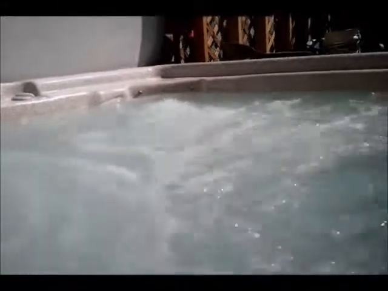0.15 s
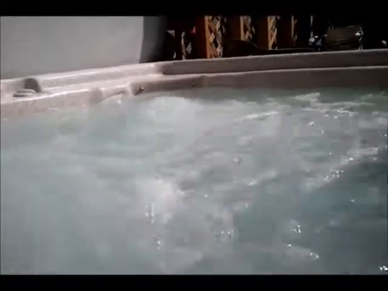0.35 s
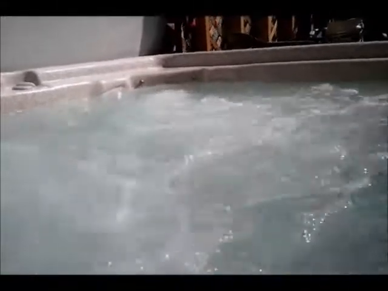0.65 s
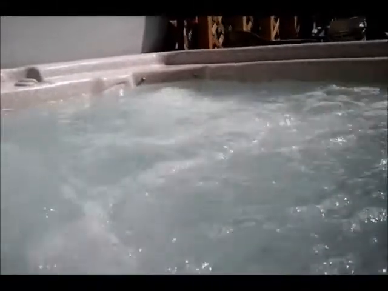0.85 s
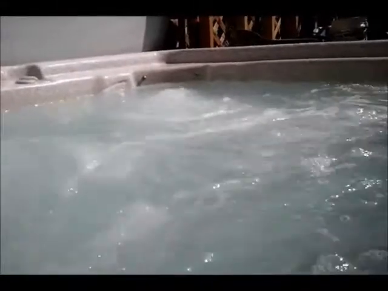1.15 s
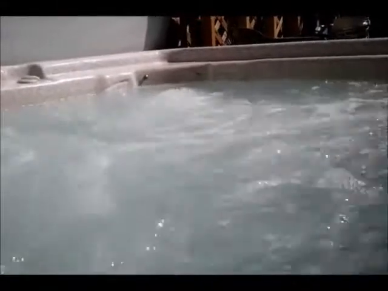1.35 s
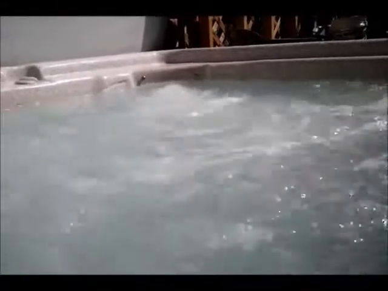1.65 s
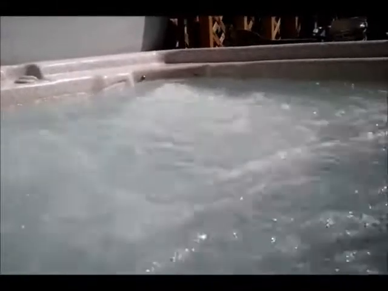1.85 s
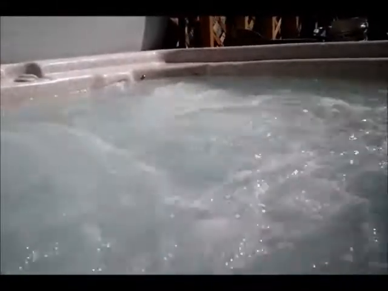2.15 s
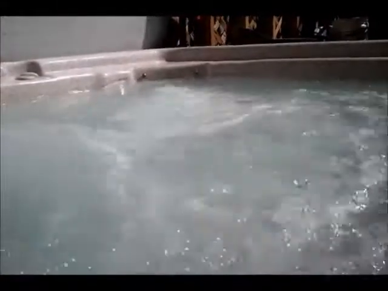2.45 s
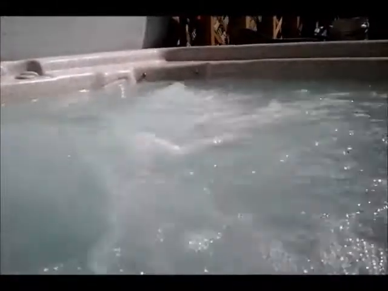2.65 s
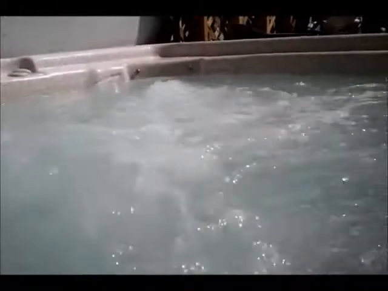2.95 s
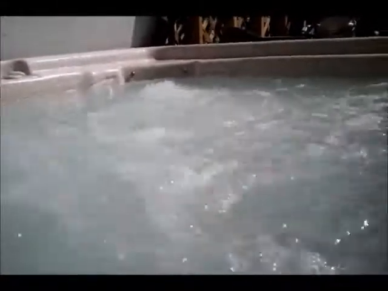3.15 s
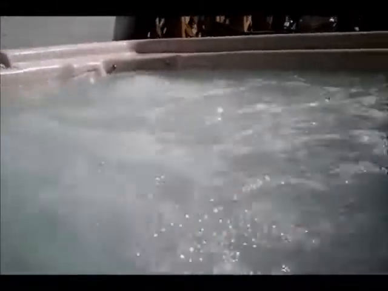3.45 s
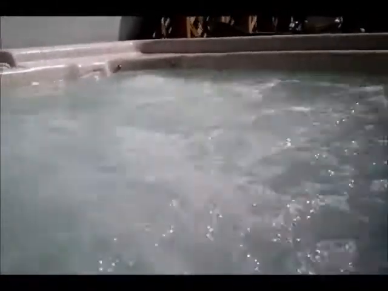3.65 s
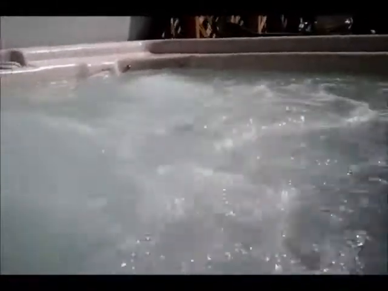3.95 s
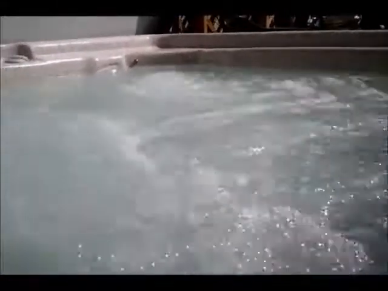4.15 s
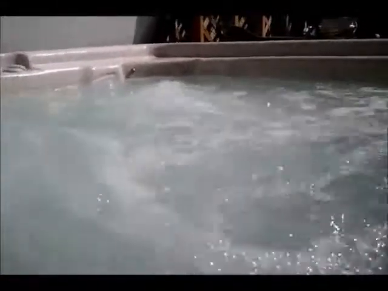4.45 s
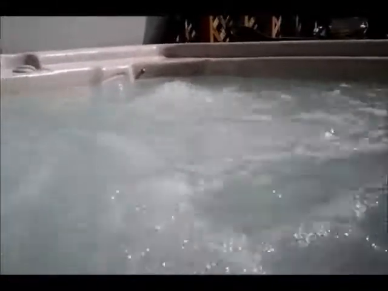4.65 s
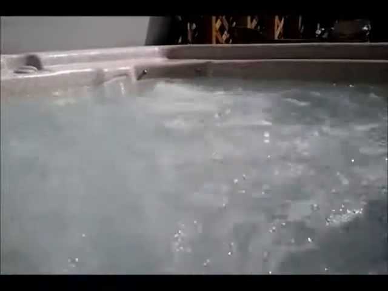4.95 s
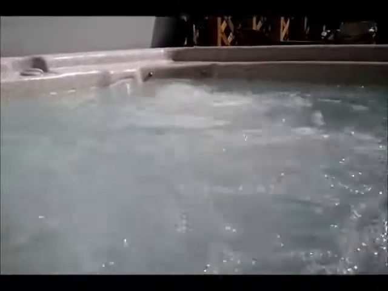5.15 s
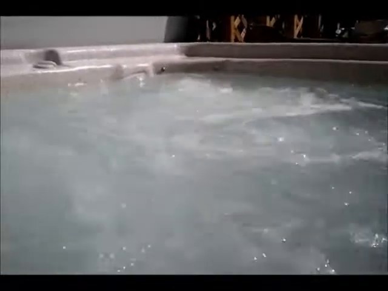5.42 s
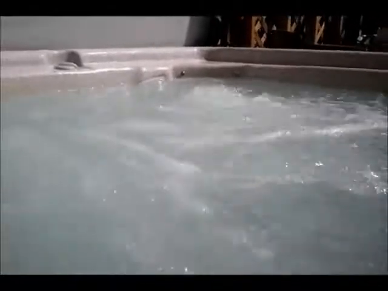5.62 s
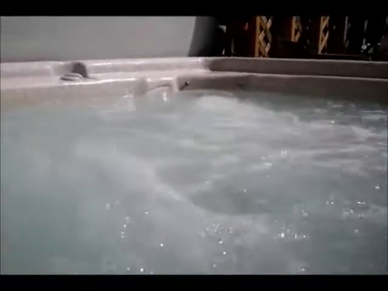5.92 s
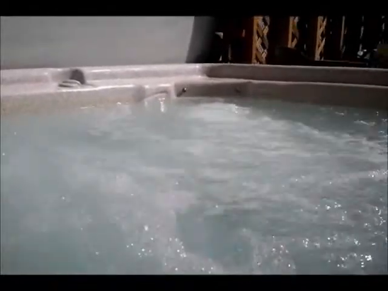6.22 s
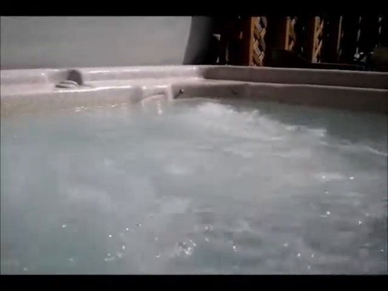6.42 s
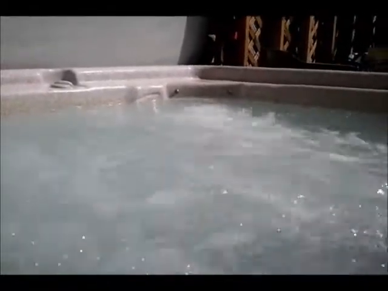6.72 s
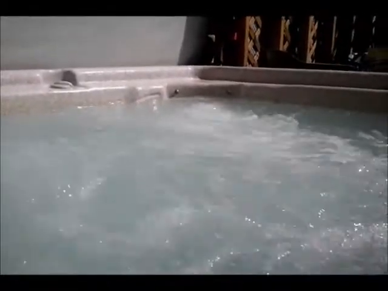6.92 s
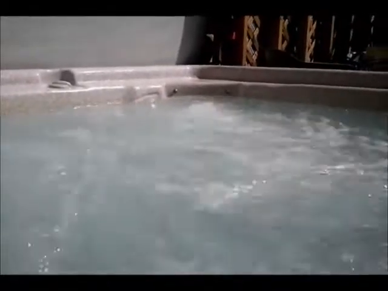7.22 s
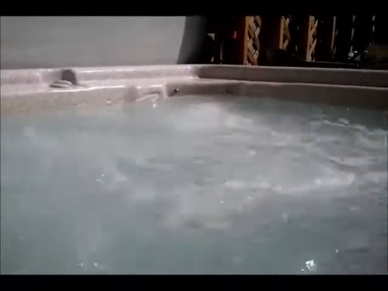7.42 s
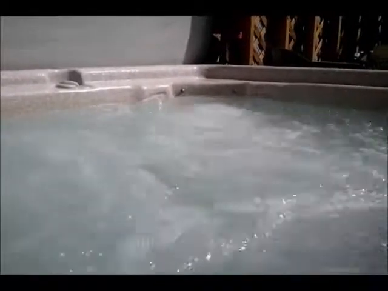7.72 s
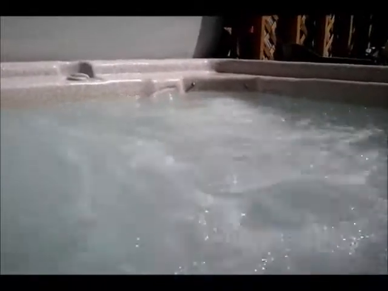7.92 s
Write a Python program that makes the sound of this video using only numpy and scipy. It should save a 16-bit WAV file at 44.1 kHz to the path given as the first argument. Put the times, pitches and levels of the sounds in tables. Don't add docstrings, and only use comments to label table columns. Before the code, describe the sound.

For about eight seconds, an outdoor hot tub boils right beside the microphone. A strong, steady low pump hum, slightly wavering in level, sits in a deep jet rumble; above it, mid-pitched bubbles gurgle unevenly and tiny ones fizz softly. A brief hollow slosh opens the sound. Between 0.6 and 1.05 seconds come hard, close splashes, the strongest near 0.7 and 0.92, sharp and ringing. More plops and spray follow around 1.4 and 1.8, with low gulps near 1.6. The churning then continues, with a soft low gulp at 2.6. A spray-filled splash hits at 3.25. Water mostly churns until a small gulp at 5.55, hollow slops and plops near 6.7 to 6.9, and a faint slap at 7.8. Loud peaks distort and momentarily duck everything; the treble is limited and there is little echo.

```python
import sys
import numpy as np
from scipy import signal
from scipy.fft import rfft, irfft, next_fast_len
from scipy.io import wavfile
from scipy.ndimage import uniform_filter1d, map_coordinates

SR = 44100
rng = np.random.default_rng(int(sys.argv[2]) if len(sys.argv) > 2 else 0)


def bounce(signal):
    frames = np.transpose(np.atleast_2d(signal))
    limited = np.clip(frames, -1, 1)
    pcm = np.round(limited * 32767).astype(np.int16)
    wavfile.write(sys.argv[1], SR, pcm)


def decibels_to_gain(level_db):
    exponent = np.asarray(level_db, float) / 20
    return 10 ** exponent


N = 356311


def unit(x):
    return x / np.sqrt(np.mean(x ** 2) + 1e-20)


def wobble(rate):
    knots = rng.standard_normal(int(N * rate / SR) + 4)
    return map_coordinates(knots, [np.arange(N) * rate / SR])


def coloured(x, spectrum):
    m = next_fast_len(N + 8192)
    f, db = np.transpose(spectrum)
    log_hz = np.log(np.fft.rfftfreq(m, 1 / SR) + 1)
    gain = decibels_to_gain(np.interp(log_hz, np.log(f), db, -120, -120))
    return unit(irfft(rfft(x, m) * gain, m)[:N])


def patchy(depth_db):
    z = signal.stft(rng.standard_normal(N), nperseg=512)[2]
    field = uniform_filter1d(rng.standard_normal(z.shape), 5, 0)
    field = uniform_filter1d(field, 10, 1)
    return unit(signal.istft(z * decibels_to_gain(depth_db * unit(field)), nperseg=512)[1][:N])


def bubbles(count, mid_hz, spread, cycles, scatter_db, size):
    draw = rng.random((count, 3))
    hz = mid_hz * np.exp(spread * rng.standard_normal((count, 1)))
    turns = hz * np.arange(size) / SR
    life = turns / cycles
    ring = np.sin(2 * np.pi * turns * (1 + 0.13 * life))
    ring *= np.exp(-3 * life) * (1 - np.exp(-2 * turns))
    ring *= decibels_to_gain(-scatter_db * np.log(draw[:, 1:2] + 1e-4))
    ring *= np.hanning(2 * size)[size:]
    at = (draw[:, :1] * N).astype(int) + np.arange(size)
    return unit(np.bincount(at.ravel(), ring.ravel(), N + size)[:N])


def pump():
    hum_hz, start_phase = 120.006, 1.75
    turn = 2 * np.pi * hum_hz * np.arange(N) / SR + start_phase
    hum = np.sin(turn) + decibels_to_gain(-26) * np.sin(2 * turn)
    return decibels_to_gain(-7.5 + 1.57 * wobble(4.036)) * hum


# time in seconds, level in dB.
CHURN = [(0.0, -22.5), (0.4, -24), (0.83, -22.5), (2.16, -23.5), (2.43, -22.5), (3.19, -24), (4.91, -24.5),
         (5.15, -22), (6.05, -24.5), (6.82, -23), (7.0, -23), (7.29, -25), (7.97, -22), (8.08, -22)]


def boil():
    s, db = np.transpose(CHURN)
    return np.interp(np.arange(N) / SR, s, db - db.mean())


# frequency in Hz, level in dB per Hz.
RUMBLE = [(12, -13), (25, -15), (45, -3), (70, -2), (100, 1.5), (160, -4.5), (220, -3), (330, -7),
          (520, -6.5), (750, -12.5), (1100, -19), (1600, -20.5), (2500, -49.5)]


def rumble(boil_db):
    pockets = bubbles(count=2500, mid_hz=329.4, spread=0.523, cycles=3.5, scatter_db=1.3, size=1600)
    return decibels_to_gain(-12.5 + 0.2 * boil_db) * coloured(patchy(0.27) + 0.091 * pockets, RUMBLE)


# frequency in Hz, level in dB per Hz.
GURGLE = [(500, -22), (900, -5.5), (1300, -9.5), (1700, -5), (2000, -6), (2300, -6.5), (2900, -11.5),
          (3600, -18.5), (5000, -48)]


def gurgle(boil_db, surge):
    middles = bubbles(count=6000, mid_hz=1847, spread=0.36, cycles=15.6, scatter_db=1.8, size=700)
    return decibels_to_gain(-20.5 + 1.4 * boil_db + 0.84 * surge) * coloured(patchy(2.3) + 0.27 * middles, GURGLE)


# frequency in Hz, level in dB per Hz.
FIZZ = [(2000, -24), (3000, -9.5), (3700, -8), (4300, -3), (5200, -1), (6300, -1), (6900, -5),
        (7300, -11.5), (7600, -32)]


def fizz(boil_db, surge):
    tinies = bubbles(count=16000, mid_hz=5000, spread=0.3, cycles=5.1, scatter_db=-0.6, size=120)
    return decibels_to_gain(-19.5 + 0.95 * boil_db + 0.43 * surge) * coloured(patchy(1.0) + 0.3 * tinies, FIZZ)


def water():
    boil_db = boil()
    surge = wobble(9)
    return rumble(boil_db) + gurgle(boil_db, surge) + fizz(boil_db, surge)


# peak time in seconds, peak level in dB, fading time in seconds.
SLOPS = [(0.0, -7.5, .015), (.43, -20.5, .08), (.56, -18, 0.025), (.72, -14.5, 0.028), (.94, -14, 0.063),
         (1.37, -28, 0.13), (1.62, -29.5, 0.075), (2.0, -28.5, 0.3), (2.36, -29, .3), (3.24, -15.5, .04),
         (4.39, -25, 0.41), (4.92, -22.5, 0.11), (5.15, -16, .14), (6.71, -11.5, .03), (6.91, -29, .15),
         (7.92, -23, .3)]
# frequency in Hz, level in dB per Hz.
SLOT = [(1600, -44), (1900, -12), (2030, 3.5), (2150, -10.5), (2500, -38.5)]


def skimmer():
    rise_share, rest_db = 0.23, -32
    s, db, fade_s = np.transpose(SLOPS)[:, :, None]
    since = (np.arange(0, N, 64) / SR - s) / np.maximum(fade_s, .005)
    slops = decibels_to_gain(db) * np.exp(np.minimum(-since, since / rise_share))
    swell = np.repeat(slops.sum(axis=0) + decibels_to_gain(rest_db), 64)[:N]
    return swell * decibels_to_gain(-4.0 + 0.66 * wobble(25)) * coloured(rng.standard_normal(N), SLOT)


# start in seconds, peak level in dB, bubble pitch in Hz, 60 dB decay time in seconds,
# spray level in dB.
BURSTS = [
    (0.7068, 12, 1880, 0.031, -9),
    (0.919, 13, 1945, 0.099, -14),
    (3.2433, 5, 2310, 0.096, 11),
]
# start in seconds, peak level in dB, bubble pitch in Hz, 60 dB decay in seconds.
PLOPS = [(0.6218, 3.5, 5150, 0.019), (.7376, -8.5, 1810, 0.073), (0.9004, -6.5, 2270, .06),
         (0.926, -1.5, 4220, 0.13), (1.047, -7, 4230, 0.062), (1.42, -0.5, 2000, 0.11),
         (1.4385, 0, 1636, 0.11), (1.455, -3.5, 1476, .12), (1.8071, -2.5, 1680, 0.046),
         (1.8214, 0, 2010, .06), (1.8427, -6, 2210, 0.042), (1.8817, 1.5, 1960, 0.033),
         (3.274, -1, 2125, 0.076), (6.6987, -6, 1980, 0.14), (6.711, -6, 1767, 0.087),
         (6.7394, -6, 2130, 0.056), (6.884, -11.5, 1390, 0.28)]
# start in seconds, peak level in dB, bubble pitch in Hz, 60 dB decay in seconds.
SLAPS = [(.067, -8, 1740, .05), (0.634, -9.5, 6420, 0.2), (0.645, -5, 5000, .18), (0.684, 1, 1864, 0.1),
         (0.691, -10, 3650, .08), (0.919, 3, 4520, 0.13), (1.4125, 2, 4170, 0.071),
         (1.4372, 0.5, 4360, 0.053), (1.952, -6.5, 1510, 0.053), (3.227, -3, 6440, 0.077),
         (3.2305, -7.5, 2160, 0.032), (3.2386, -6.5, 2030, 0.044), (3.249, -3, 5340, 0.085),
         (6.5214, -9.5, 2390, .17), (6.906, -11.5, 1885, 0.22), (7.833, -7, 6540, .054)]
# start in seconds, peak level in dB, bubble pitch in Hz, 60 dB decay in seconds.
GULPS = [
    (.674, -4, 5050, 0.092),
    (0.884, -4.5, 1160, 0.055),
    (1.56, -11.5, 224, .3),
    (1.67, -8.5, 226, 0.44),
    (2.62, -11.5, 445, 0.28),
    (5.5615, -5, 1417, 0.056),
]


def landings():
    rows = []
    for s, db, hz, t60, spray_db in BURSTS:
        for k in range(4):
            rows.append((s + k * .0105, db - k * 2, hz, t60, spray_db - k * 4.5))
    for table, spray_db in ((PLOPS, -11.5), (SLAPS, 3), (GULPS, -40)):
        rows += [(*row, spray_db) for row in table]
    return rows


# frequency in Hz, level in dB per Hz.
SPRAY = [(400, -12.5), (1000, -8.5), (2000, -2), (3200, -6.5), (4300, -4.5), (6000, -6.5), (7300, -14),
         (7700, -24)]


def splashes():
    t = np.arange(SR // 4) / SR
    rings, puffs = np.zeros(N + len(t)), np.zeros(N + len(t))
    for s, db, hz, t60, spray_db in landings():
        start = round(s * SR)
        fade = decibels_to_gain(db + 0.5 - 60 * t / max(t60, .01)) * (1 - np.exp(-t / 0.00053))
        chance = rng.standard_normal(5)
        size_spread = .085 * decibels_to_gain(.3 * spray_db)
        pitch = hz * (1 + size_spread * (chance - chance.mean())[:, None])
        cluster = np.sin(2 * np.pi * pitch * t).sum(axis=0) / 3.24
        slap = 1 + 0.47 * np.exp(-t / 0.0017)
        rings[start:][:len(t)] += fade * cluster
        puffs[start:][:len(t)] += fade * decibels_to_gain(spray_db - 11) * slap
    grains = decibels_to_gain(2 * wobble(400)) * rng.standard_normal(N)
    return rings[:N] + puffs[:N] * coloured(grains, SPRAY)


def scene():
    return (pump() + water() + skimmer() + splashes())[None]


def below(x, top_hz):
    m = next_fast_len(N + 4096)
    return irfft(rfft(x, m) * (np.fft.rfftfreq(m, 1 / SR) < top_hz), m)[:N]


def band_limit(x):
    return signal.sosfilt(signal.butter(12, 15800, fs=SR, output="sos"), x)


def record(dry):
    x = dry[0] - .41
    release_db = 215 * np.arange(N) / SR
    over_db = np.maximum(20 * np.log10(np.abs(x) + 1e-6) + 1.69, 0)
    held_db = np.maximum.accumulate(over_db + release_db) - release_db
    keep = np.exp(-1 / (.011 * SR))
    x = x * decibels_to_gain(-.85 * signal.lfilter([1 - keep], [1, -keep], held_db))
    x = x / (1 + np.abs(x / 1.15) ** 4) ** (1 / 4)
    clipped = np.clip(decibels_to_gain(0.0838) * below(x, 7500), -1, 1)
    x = below(clipped, 15800)
    return band_limit(.985 * x[None])


dry = scene()
out = record(dry)
bounce(out)
```